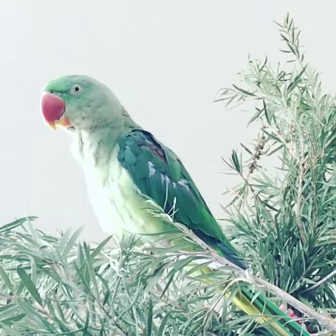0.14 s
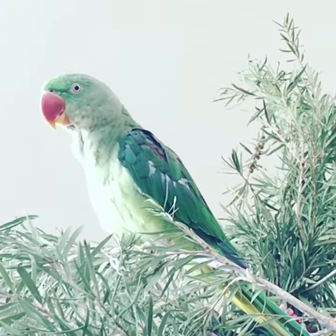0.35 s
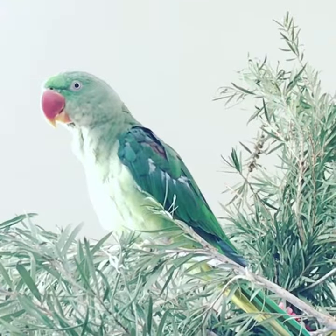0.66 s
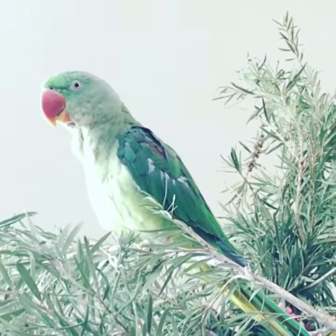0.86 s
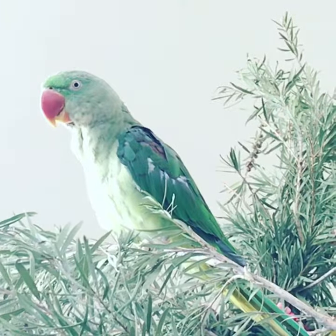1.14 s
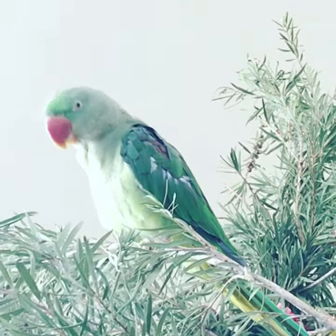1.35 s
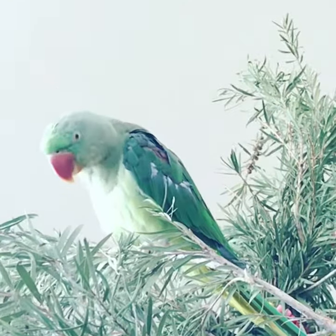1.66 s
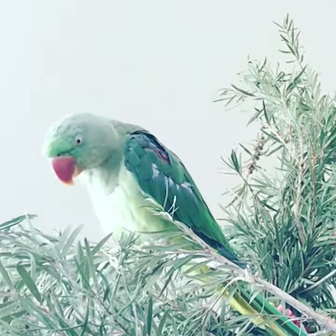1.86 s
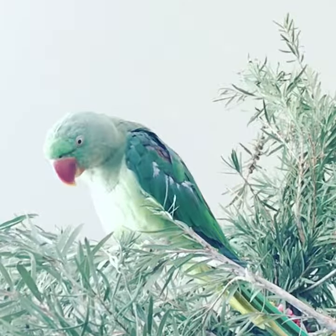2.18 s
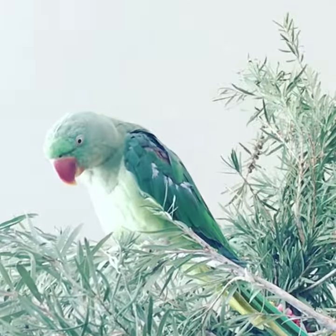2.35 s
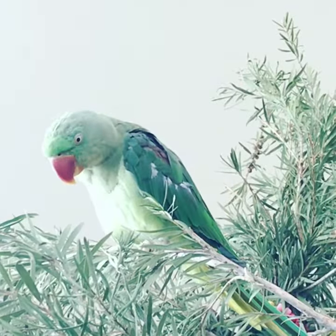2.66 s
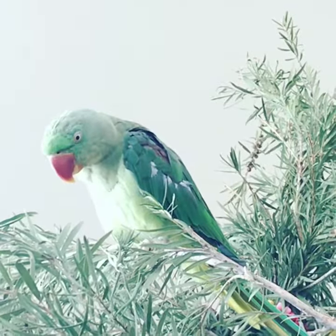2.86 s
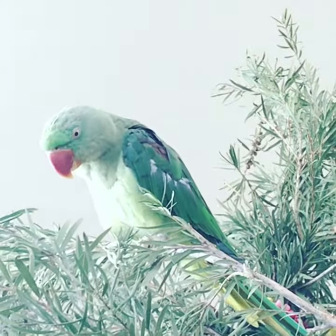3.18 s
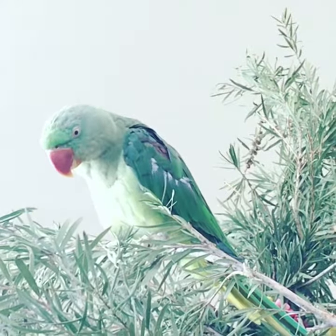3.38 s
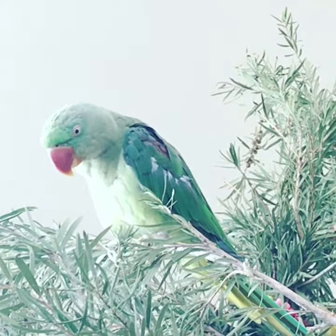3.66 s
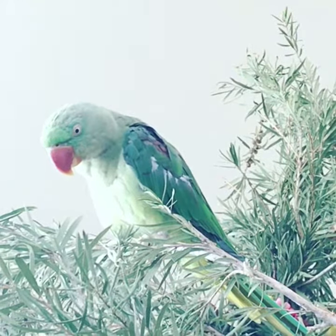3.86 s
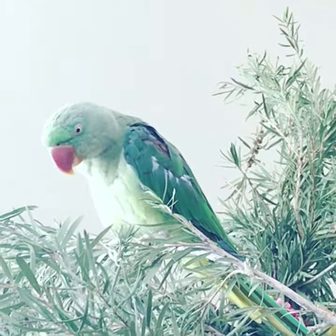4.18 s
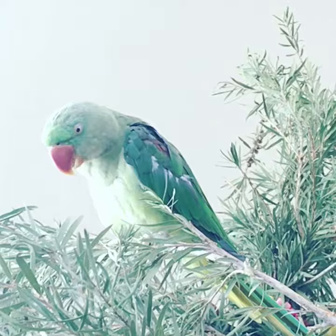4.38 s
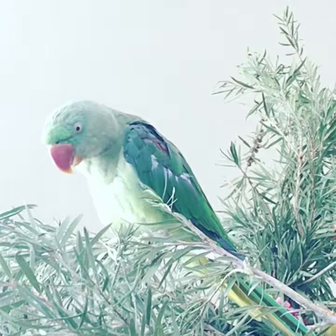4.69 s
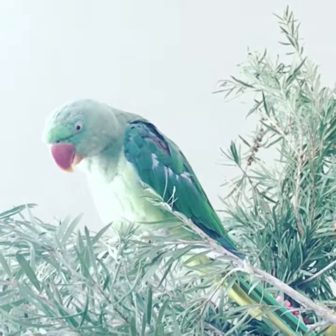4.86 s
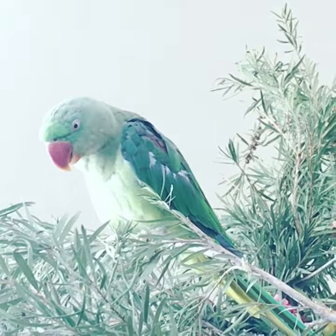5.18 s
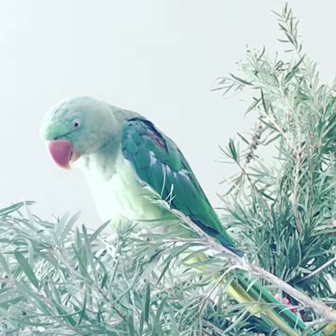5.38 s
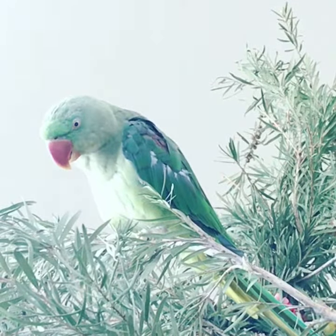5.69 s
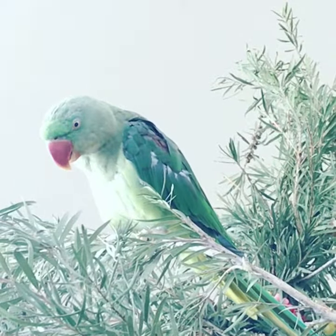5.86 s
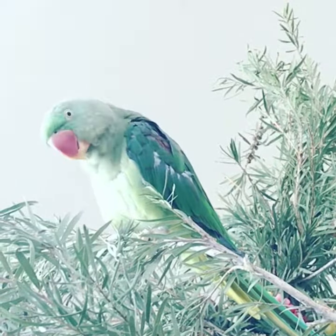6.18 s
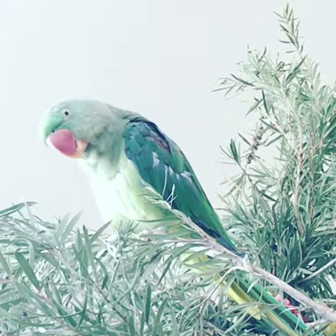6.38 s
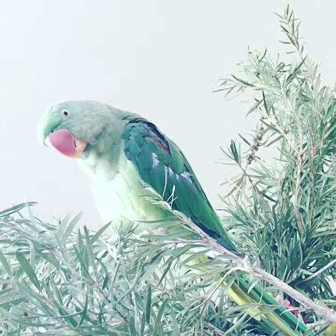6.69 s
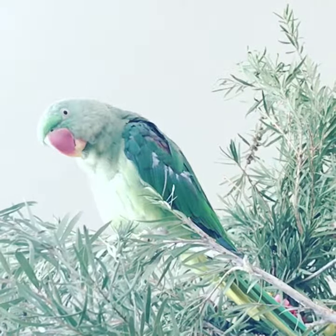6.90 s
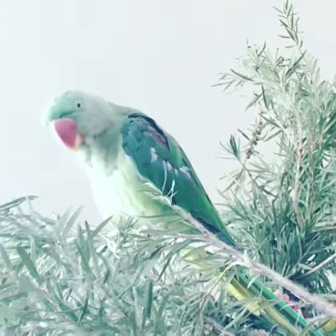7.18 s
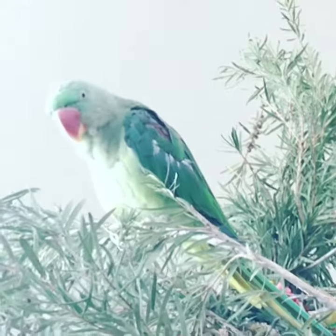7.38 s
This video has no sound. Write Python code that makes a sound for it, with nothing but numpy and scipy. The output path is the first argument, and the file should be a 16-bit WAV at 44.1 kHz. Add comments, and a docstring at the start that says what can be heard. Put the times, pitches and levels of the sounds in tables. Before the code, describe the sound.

One parakeet whistles, screeches, clicks its beak, squawks hoarsely, mews and ends on bright upward chirps, ringing off hard walls over faint steady noise.

```python
"""A parakeet calls beside hard walls: two wolf whistles, a screech, a long falling whistle, beak clicks,
hoarse squawks, a mewing call and rising chirps. Each call is a gliding syrinx tone with overtones,
roughened by random pitch tremor. Hisses and clicks are shaped noise; clicks also ring faintly.
Random echoes form the wall ring. Behind it all: steady noise, a faint hum, a thin whine, one low rumble."""
import sys
import numpy as np
from scipy import signal
from scipy.fft import rfft, irfft, next_fast_len
from scipy.io import wavfile

SR = 44100
rng = np.random.default_rng(int(sys.argv[2]) if len(sys.argv) > 2 else 0)


def put_to_file(sound):
    """Save the sound as 16-bit audio at rate SR, in the file named by the first command-line argument."""
    columns = np.atleast_2d(sound).T  # one column per channel
    safe = np.clip(columns, -1, 1)
    whole_steps = np.round(safe * 32767)
    wavfile.write(sys.argv[1], SR, whole_steps.astype(np.int16))


N = 332514

# Call levels are those before the walls.
# background spectrum, relative density: freq_hz, level_db
FLOOR_SPECTRUM = [(20, -38), (35, -6.5), (55, 0), (100, -0.5), (160, -8), (330, -8), (520, -15),
                  (700, -12.5), (1000, -14.5), (2000, -21.5), (3600, -32), (5400, -33.5), (9000, -39),
                  (15800, -43.5)]
FLOOR_DB = -53
RUMBLE_AT_S, RUMBLE_ATTACK_S, RUMBLE_DB, RUMBLE_FADE_DB_PER_S = 2.41, 0.058, -40.5, 53
# wall ring: freq_hz, t60_s
WALL_DECAY = [(500, 0.36), (1500, 0.55), (2500, 0.65), (4500, 0.61), (8000, 0.51), (14000, 0.43)]
# growing echo of the long whistle: onset, time constant, echo share at first and at last (0-1)
ECHO_RISE_AT_S, ECHO_RISE_S, ECHO_SHARE_START, ECHO_SHARE_END = 2.42, 0.32, 0.14, 0.78

# beak clicks: start_s, level_db, decay_s, centre_hz
CLICK_EVENTS = [(2.069, -48.5, 0.015, 4800), (3.461, -38.5, 0.0043, 4980), (3.467, -38, 0.024, 5350),
                (3.679, -48, 0.005, 4750), (3.844, -34.5, 0.0077, 4630), (4.054, -36.5, 0.0049, 4730),
                (5.183, -47, 0.016, 7600), (7.252, -41, 0.0022, 5150)]
# beak and mouth resonances: centre_ratio, width_ratio, level_db
BEAK_MODES = [(0.269, .025, 3), (0.488, 0.013, 3.5), (0.649, 0.042, 1.5), (.94, .06, 8), (1.33, .08, 1.5),
              (1.8, 0.12, -9)]
# open-beak hisses: start_s, length_s, centre_hz, level_db
HISS_EVENTS = [(1.031, 0.051, 3940, -34), (1.348, 0.056, 4640, -33.5), (1.639, 0.089, 4960, -49),
               (4.473, 0.15, 6800, -61.5), (4.705, 0.073, 5400, -50), (5.184, 0.047, 3670, -42.5)]

# short calls, one table a kind:
# start_s, rise_s, fall_s, first_hz, top_hz, last_hz, attack_s, peak_db, fade_db
WOLF_WHISTLE_CALLS = [(.38, 0.088, .03, 1220, 1902, 1940, .072, -31.5, -25),
                      (.575, 0.13, .3, 1110, 1789, 972, .11, -39, -17.5),
                      (1.54, 0.077, 0.0403, 1112, 1970, 2024, 0.064, -34.5, -10.5),
                      (1.72, .16, 0.24, 1201, 1554, 1052, 0.034, -42.5, -8)]
# low hums and one higher: same columns
HUM_CALLS = [(.17, 0.18, 0.065, 1076, 1140, 1050, 0.031, -56, -2),
             (.45, 0.029, .05, 1100, 1074, 1087, .04, -50, -4),
             (2.01, 0.023, 0.036, 2180, 2244, 2234, 0.031, -50, -2)]
# chip: same columns
CHIP_CALLS = [(2.06, .04, 0.0021, 529, 1240, 1240, 0.023, -40.5, -9)]
# yip: same columns
YIP_CALLS = [(2.135, .04, .04, 1362, 1343, 1556, 0.026, -36, -7)]
# rising chirps: same columns
CHIRP_CALLS = [(2.2, 0.025, 0.01, 2950, 4130, 4220, 0.026, -26.5, -9),
               (7.22, 0.12, 0.029, 1966, 4090, 4200, 0.075, -26, -1),
               (7.458, .058, 0.03, 3754, 4070, 4100, 0.056, -23.5, -1)]
# faint chirps: same columns
FAINT_CHIRP_CALLS = [(4.94, 0.2, .012, 2160, 2476, 2520, 0.067, -67.5, 3),
                     (6.285, 0.064, 0.11, 2870, 4100, 3510, 0.016, -56.5, -6.5),
                     (6.57, .11, 0.095, 2260, 2916, 2910, 0.12, -52.5, -13)]
# hoarse squawk: same columns
SQUAWK_CALLS = [(4.2, .06, .072, 1061, 1164, 1108, 0.049, -35, -9.5)]
# rasps: same columns
RASP_CALLS = [(1.47, 0.072, 0.064, 2790, 2817, 2800, .05, -43, -18),
              (1.68, 0.011, 0.14, 3490, 3430, 3245, 0.014, -42.5, -10.5),
              (4.485, 0.013, .12, 3950, 3645, 3050, .04, -43, 3)]
FALL_SKEW = .7  # exponent; under 1, the glide after the top is steepest early
# brief level dips (lower partials only in the whistle and mew): centre_s, half_length_s, depth_db
LEVEL_DIPS = [(2.244, 0.015, -13), (2.943, 0.019, -17), (3.014, 0.0066, -33), (5.293, .022, -11),
              (5.728, 0.048, -8.5), (7.32, 0.0054, -10)]

# mew pitch: time_s, pitch_hz
MEW_PITCH = [(5.18, 799), (5.2, 1028), (5.23, 941), (5.3, 1063), (5.33, 1011), (5.54, 1009), (5.598, 926.3),
             (5.79, 837.5), (5.95, 791), (6.13, 409.6)]
# mew effort: time_s, level_db
MEW_LEVEL = [(5.18, -34.5), (5.22, -33), (5.34, -32), (5.49, -28), (5.54, -29.5), (5.6, -30), (5.82, -31.5),
             (5.96, -39), (6.13, -52.5)]
# throat resonances: centre_hz, width_hz, level_db
THROAT_MODES = [(2870, 210, -5), (3766, 120, -4.5)]
# mouth response to the mew's upper partials: freq_hz, level_db
MOUTH_RESPONSE = [(3500, -2), (4300, 4.5), (5000, 5.5), (6100, 2), (7200, 6), (8200, -2.5), (9200, -6.5),
                  (10500, -19), (12200, -8.5), (14500, -21), (16000, -32)]
MEW_ROUGH, MEW_ROUGH_START, MEW_CLEARS_S = 0.11, 0.21, 0.15
MIDDLE_GROWTH_DB_PER_DB, UPPER_GROWTH_DB_PER_DB = 1.41, 1  # partials 3-4, partials 5 and up
MEW_DULL_AT_S = 5.97  # upper partials vanish as the pitch collapses

# screech pitch: time_s, pitch_hz
SCREECH_PITCH = [(1.046, 1990), (1.065, 2204), (1.115, 2398), (1.245, 2294), (1.3, 2178), (1.385, 2106)]
SCREECH_DB, SCREECH_UPPER_DB, SCREECH_ATTACK_S = -25, -33.5, 0.037
SCREECH_ROUGH, HARSH_START, HARSH_S, BROKEN_ROUGH = 0.349, 0.64, 0.0187, 0.37
SPLIT_AT_S, BREAK_AT_S = 1.29, 1.35

# long whistle pitch: time_s, pitch_hz
WHISTLE_PITCH = [(2.16, 1823), (2.202, 1969), (2.43, 1925), (2.446, 1896), (2.72, 1818), (2.966, 1698),
                 (3.082, 1697), (3.11, 1621), (3.174, 1742), (3.188, 1776), (3.245, 1770)]
WHISTLE_DB, WHISTLE_UPPER_DB, TIRING_DB, TIRES_AT_S = -31, -45, -4.5, 2.92
WAVER_START, WAVER_END, WHISTLE_ROUGH_END = 0.0015, 0.01, 0.18

# overtones of the screech: harmonic, level_db
SCREECH_HARMONICS = [(1, -16), (2, -5), (3, -5.5), (4, -13), (5, -20.5), (6, -26.5), (7, -27)]
# of the long whistle: harmonic, level_db
WHISTLE_HARMONICS = [(1, 0), (2, -31), (3, -10.5), (4, -18), (5, -15.5), (6, -29), (7, -30.5), (8, -41)]
# of the mew's lower partials: harmonic, level_db
MEW_HARMONICS = [(1, -0.84), (2, 1.4)]
# of the first wolf whistle: harmonic, level_db
SOFT_HARMONICS = [(1, -1), (2, -22), (3, -26), (4, -22.5), (5, -28), (6, -22.5), (7, -26.5), (8, -33)]
# of the second wolf whistle and the chip: harmonic, level_db
DULL_HARMONICS = [(1, -1), (2, -20), (3, -24.5), (4, -30), (5, -25.5)]
# of the yip: harmonic, level_db
YIP_HARMONICS = [(1, -7.5), (2, -8.5), (3, -0.5), (4, -10)]
# of the later chirps: harmonic, level_db
CHIRP_HARMONICS = [(1, 1), (2, -14), (3, -25)]
# of the squawk: harmonic, level_db
SQUAWK_HARMONICS = [(1, -1), (2, 0), (3, 3), (4, 2), (5, -1.5), (6, -5.5), (7, -9.5), (8, -15.5), (9, -30),
                    (11, -29)]
# nearly pure tone: harmonic, level_db
PURE_HARMONICS = [(1, 12), (2, -35)]
EDGE_HZ = 15850


def amp(db):
    """Decibels to gain."""
    return 10 ** (np.asarray(db) / 20)


def evened(x):
    """Scales to rms 1."""
    return x / np.sqrt(np.mean(x ** 2) + 1e-20)


def read(points, hz):
    """Interpolates a spectrum on a log-frequency axis."""
    f_hz, value = np.transpose(points)
    return np.interp(np.log(hz + 1e-6), np.log(f_hz), value)


def curve(rows):
    """Sample times of a call and its curve at those times."""
    time_s, value = np.transpose(rows)
    t = np.arange(time_s[0], time_s[-1], 1 / SR)
    return t, np.interp(t, time_s, value)


def ease(u):
    """Smooth step from 0 to 1 as u goes from 0 to 1."""
    return .5 - .5 * np.cos(np.pi * np.clip(u, 0, 1))


def dips_db(t):
    """Sum of the bell-shaped level dips at times t, negative dB."""
    return sum(db * np.exp(-((t - s) / half_s) ** 2) for s, half_s, db in LEVEL_DIPS)


def placed(start_s, sound, fade_s=0.0017):
    """The sound, with soft ends, at its time in silence."""
    k = np.arange(len(sound))
    soft = sound * np.clip(np.minimum(k, k[::-1]) / (fade_s * SR), 0, 1)
    lead = np.zeros(max(round(start_s * SR), 0))
    return np.concatenate([lead, soft, np.zeros(N)])[:N]


def noise(size, colour):
    """Noise scaled to rms 1, with gain colour(hz) at each frequency."""
    full = next_fast_len(size + 4096)
    spectrum = rfft(rng.standard_normal(full)) * colour(np.fft.rfftfreq(full, 1 / SR))
    return evened(irfft(spectrum, full))[:size]


def band(size, hz, width_hz):
    """Noise in a bell-shaped band."""
    return noise(size, lambda f: np.exp(-.5 * ((f - hz) / width_hz) ** 2))


def background():
    """Shaped noise, narrow bands for hum and whine, and a fading low-band rumble."""
    steady = amp(FLOOR_DB) * noise(N, lambda f: amp(read(FLOOR_SPECTRUM, f)))
    hum = amp(-62) * band(N, 59.6, 0.83)
    whine = amp(-71.5) * band(N, 3366, 60)
    t = np.arange(SR) / SR
    swell = ease(t / RUMBLE_ATTACK_S) * amp(RUMBLE_DB - RUMBLE_FADE_DB_PER_S * t)
    rumble = swell * band(len(t), 83, 73)
    return steady + hum + whine + placed(RUMBLE_AT_S, rumble)


def walls(x, wet_db, early_db=-3, early_s=0.011):
    """Direct sound, near reflections and a dense tail with frequency-dependent decay; unit-energy response."""
    taps = np.zeros(SR)
    at = np.arange(400, SR - 20, 20)
    taps[at + rng.integers(0, 20, len(at))] = rng.choice([-1, 1], len(at))
    hz, t, z = signal.stft(taps, SR, nperseg=256)
    decay = amp(-60 * t / read(WALL_DECAY, hz)[:, None])
    tail = signal.istft(z * decay, SR, nperseg=256)[1]
    early = np.zeros(len(tail))
    delay_s = rng.uniform(.002, .035, size=12)
    early[(delay_s * SR).astype(int)] = rng.choice([-1, 1], len(delay_s)) * np.exp(-delay_s / early_s)
    reflections = tail / np.linalg.norm(tail) + amp(early_db) * early / np.linalg.norm(early)
    response = amp(wet_db) * reflections
    response[0] += 1  # direct sound
    return signal.fftconvolve(x, response / np.linalg.norm(response))[:N]


def growing_echo(x):
    """Crossfades to a more reverberant wall response; the echoes beat with the direct tone."""
    since_s = np.maximum(np.arange(N) / SR - ECHO_RISE_AT_S, 0)
    rise = np.exp(-since_s / ECHO_RISE_S)
    share = np.clip(ECHO_SHARE_END + (ECHO_SHARE_START - ECHO_SHARE_END) * rise, 0, 1)
    size = np.sqrt(share ** 2 + (1 - share) ** 2 + share * (1 - share))
    drier = walls(x * (1 - share) / size, wet_db=-6.0)
    wetter = walls(x * share / size, wet_db=-4, early_db=4.0)
    return drier + wetter


def beak(ratio):
    """Gain of the beak's resonances at a multiple of the click's centre."""
    return np.sqrt(sum(amp(db) ** 2 / (1 + ((ratio - at) / width) ** 2) ** 0.95
                       for at, width, db in BEAK_MODES))


def clicks(ring_db=-21, ring_s=0.034):
    """The beak's edges snap past each other: a short burst plus a faint ring of its lowest resonances."""
    t, out = np.arange(SR // 5) / SR, np.zeros(N)
    for start_s, db, decay_s, hz in CLICK_EVENTS:
        burst = noise(len(t), lambda f: beak(f / hz)) * np.exp(-t / decay_s)
        modes = sum(amp(mode_db) * np.sin(2 * np.pi * at * hz * t) for at, _, mode_db in BEAK_MODES[:3])
        ring = amp(ring_db) * modes * np.exp(-t / ring_s)
        out += placed(start_s, amp(db) * (burst + ring), fade_s=0.0012)
    return out


def hisses(width_hz=1500):
    """Unvoiced swells of air through the beak: windowed noise bands."""
    out = np.zeros(N)
    for start_s, length_s, hz, db in HISS_EVENTS:
        size = int(length_s * SR)
        out += placed(start_s, amp(db) * band(size, hz, width_hz) * signal.windows.tukey(size, .5))
    return out


def syrinx(hz, rough, tremor_hz=170, depth=0.0838, waver=0.0036):
    """Phase of the vibrating membranes: slow waver and fast tremor bend the pitch."""
    slow = waver * band(len(hz), 0, 25.4)
    fast = depth * rough * band(len(hz), 0, tremor_hz)
    return 2 * np.pi * np.cumsum(hz * (1 + slow + fast)) / SR


def partials(phase, hz, tone):
    """Harmonics of a phase, scaled to nominal rms 1; those above 0.45 SR are dropped."""
    total = np.sqrt(sum(amp(db) ** 2 for k, db in tone) / 2)
    return sum(amp(db) * np.sin(round(k) * phase) * (round(k) * hz < SR * .45) for k, db in tone) / total


def short_calls(calls, tone, rough, tremor_hz, swell_db):
    """One syrinx voice: pitch eases through three values; level swells by swell_db, then fades."""
    out = np.zeros(N)
    for start_s, rise_s, fall_s, first_hz, top_hz, last_hz, attack_s, peak_db, fade_db in calls:
        t = np.arange(0, rise_s + fall_s, 1 / SR)
        rising = ease(t / rise_s)
        falling = ease(np.maximum((t - rise_s) / fall_s, 0) ** FALL_SKEW)
        hz = first_hz + (top_hz - first_hz) * rising + (last_hz - top_hz) * falling
        swell = np.interp(t, [0, min(attack_s, t[-1]), rise_s + fall_s], [-swell_db, 0, fade_db])
        level = amp(peak_db + swell + dips_db(start_s + t))
        out += placed(start_s, level * partials(syrinx(hz, rough, tremor_hz), hz, tone))
    return out


def hums():
    """Brief, nearly pure syrinx tones with little tremor."""
    return short_calls(HUM_CALLS, PURE_HARMONICS, rough=.03, tremor_hz=79.6, swell_db=9)


def hoarse_calls():
    """Strong tremor roughens squawk and rasps, less so the faint chirps; hisses add air."""
    out = short_calls(SQUAWK_CALLS, SQUAWK_HARMONICS, rough=0.716, tremor_hz=280, swell_db=12) + hisses()
    out += short_calls(RASP_CALLS, PURE_HARMONICS, rough=0.92, tremor_hz=250, swell_db=6.5)
    return out + short_calls(FAINT_CHIRP_CALLS, PURE_HARMONICS, rough=0.21, tremor_hz=198, swell_db=13)


def chirps():
    """Rising, lightly roughened tones; the first has weaker overtones."""
    out = short_calls(CHIRP_CALLS[:1], PURE_HARMONICS, rough=0.04, tremor_hz=200, swell_db=23.5)
    return out + short_calls(CHIRP_CALLS[1:], CHIRP_HARMONICS, rough=0.022, tremor_hz=200, swell_db=34.5)


def chip_and_yip():
    """Short syrinx calls with moderate tremor."""
    out = short_calls(CHIP_CALLS, DULL_HARMONICS, rough=0.27, tremor_hz=200, swell_db=12)
    return out + short_calls(YIP_CALLS, YIP_HARMONICS, rough=0.225, tremor_hz=202, swell_db=21)


def wolf_whistles():
    """Two pairs of glides, up then up and down; the second pair has fewer overtones."""
    out = short_calls(WOLF_WHISTLE_CALLS[:2], SOFT_HARMONICS, rough=0.064, tremor_hz=120, swell_db=24)
    return out + short_calls(WOLF_WHISTLE_CALLS[2:], DULL_HARMONICS, rough=0.12, tremor_hz=120, swell_db=21)


def throat(hz):
    """Gain of the throat's resonances."""
    return np.sqrt(sum(amp(db) ** 2 / (1 + ((hz - at) / width) ** 2) ** 2
                       for at, width, db in THROAT_MODES))


def mew(middle_db=-31.0, upper_db=-46, air_db=-23, push_db=10, muted_db=-4,
        thinning_db_per_octave=6, count=16):
    """Low call rich in partials; throat resonances shape partials 3 and 4, boosted in the first push."""
    t, hz = curve(MEW_PITCH)
    db = np.interp(t, *np.transpose(MEW_LEVEL))
    effort_db = db - db.max()
    push = np.exp(-(t - t[0]) / MEW_CLEARS_S)
    phase = syrinx(hz, MEW_ROUGH + MEW_ROUGH_START * push, tremor_hz=93, depth=0.062, waver=0.0014)
    # the fundamental thins as it sinks, down to half an octave
    thin_db = thinning_db_per_octave * np.maximum(np.log2(hz / hz.max()), -.5)
    lower_tone = [(k, tone_db + (k == 1) * thin_db) for k, tone_db in MEW_HARMONICS]
    lower = amp(db + dips_db(t)) * partials(phase, hz, lower_tone)
    air = amp(air_db) * band(len(t), 3650, 430) * (1 + np.cos(phase))  # one puff a cycle
    resonant = sum(throat(k * hz) * (np.sqrt(2) * np.sin(k * phase) + air) for k in range(3, 5))
    middle = amp(MIDDLE_GROWTH_DB_PER_DB * effort_db) * amp(middle_db + push_db * push) * resonant
    upper_level = amp(upper_db + UPPER_GROWTH_DB_PER_DB * effort_db + muted_db * push)
    upper_level = upper_level * ease((MEW_DULL_AT_S - t) / 0.064 + .5)
    upper_tone = [(k, read(MOUTH_RESPONSE, k * hz)) for k in range(5, count)]
    upper = upper_level * partials(phase, hz, upper_tone)
    return placed(t[0], lower + middle + upper, fade_s=0.002)


def screech(tremor_hz=150, half=0.11, split_db=-3, split_upper_db=5, change_s=0.0098, upper_attack_s=0.0047):
    """Rough call: starts harsh, steadies, brightens as it splits to half pitch, then breaks up."""
    t, hz = curve(SCREECH_PITCH)
    age_s = t - t[0]
    split = ease((t - SPLIT_AT_S) / change_s + .5)
    broken = ease((t - BREAK_AT_S) / change_s + .5)
    rough = SCREECH_ROUGH + HARSH_START * np.exp(-age_s / HARSH_S) + BROKEN_ROUGH * broken
    phase = syrinx(hz, rough, tremor_hz=tremor_hz, depth=0.062)
    lower = amp(SCREECH_DB + split_db * split) * ease(age_s / SCREECH_ATTACK_S)
    upper = amp(SCREECH_UPPER_DB + split_upper_db * (split - broken)) * ease(age_s / upper_attack_s)
    tone = lower * partials(phase, hz, SCREECH_HARMONICS[:2])
    tone = tone + upper * partials(phase, hz, SCREECH_HARMONICS[2:])
    half_pitch = 1 + 2 * half * (split - broken) * np.cos(phase / 2)
    return placed(t[0], tone * half_pitch, fade_s=0.0046)


def whistle(flutter_hz=390, flutter_rad=0.035, rough_start=0.225, clears_s=0.055, push_db=5):
    """Clean tone that tires and grows shaky; quick phase flutter adds faint side tones."""
    t, hz = curve(WHISTLE_PITCH)
    age_s, progress = t - t[0], np.linspace(0, 1, len(t))
    push = np.exp(-age_s / clears_s)
    tired_db = TIRING_DB * ease((t - TIRES_AT_S) / 0.14 + .5)
    rough = rough_start * push + WHISTLE_ROUGH_END * progress ** 2
    waver = WAVER_START + (WAVER_END - WAVER_START) * progress
    phase = syrinx(hz, rough, tremor_hz=101, waver=waver)
    phase = phase + flutter_rad * band(len(t), flutter_hz, 7.7)
    lower = amp(WHISTLE_DB + dips_db(t)) * partials(phase, hz, WHISTLE_HARMONICS[:1])
    upper = amp(WHISTLE_UPPER_DB + push_db * push) * partials(phase, hz, WHISTLE_HARMONICS[1:])
    return placed(t[0], amp(tired_db) * (lower + upper))


def scene():
    """Sums the background and the calls; wall level set by group, growing along the long whistle."""
    bird = walls(clicks(), wet_db=-5.5) + walls(hums(), wet_db=-2.0)
    bird += walls(hoarse_calls(), wet_db=2.0) + walls(chirps(), wet_db=-3)
    bird += walls(wolf_whistles() + chip_and_yip(), wet_db=1.0)
    bird += walls(mew(), wet_db=-6.0, early_db=0) + walls(screech(), wet_db=-1.0)
    bird += growing_echo(whistle())
    return (background() + bird)[None]


def record(dry):
    """The recorder's band limit: a linear-phase low-pass."""
    lowpass = signal.firwin(511, EDGE_HZ, window=("kaiser", 9), fs=SR)
    return signal.oaconvolve(dry, lowpass[None], "same")


dry = scene()
out = record(dry)
put_to_file(out)
```